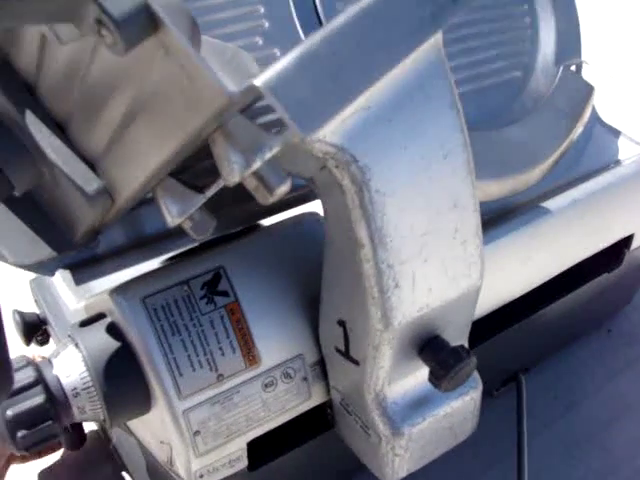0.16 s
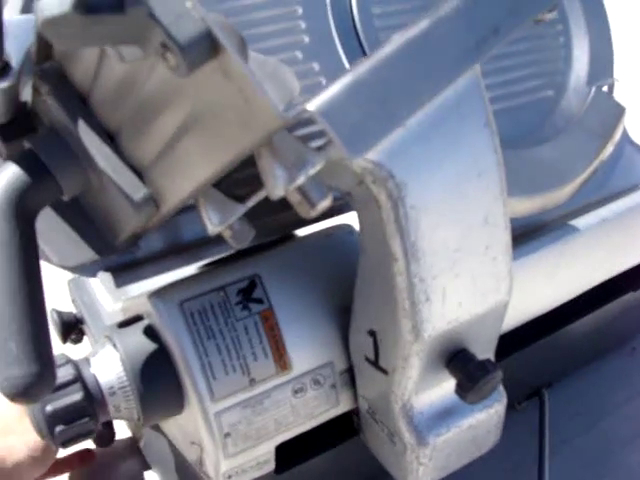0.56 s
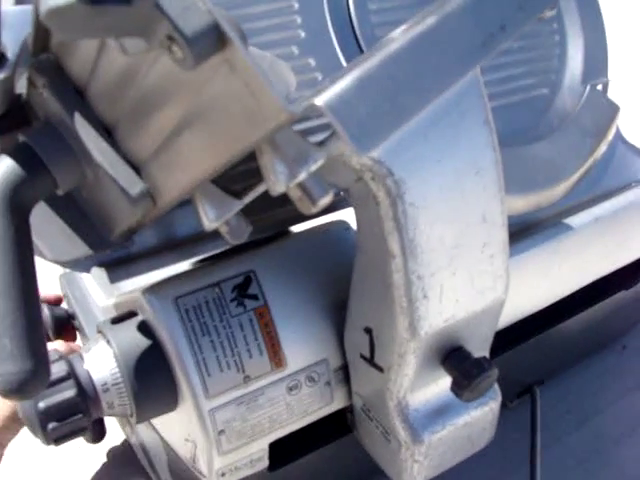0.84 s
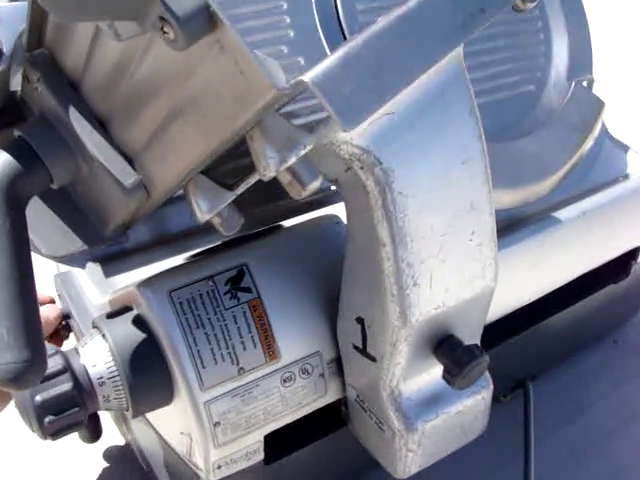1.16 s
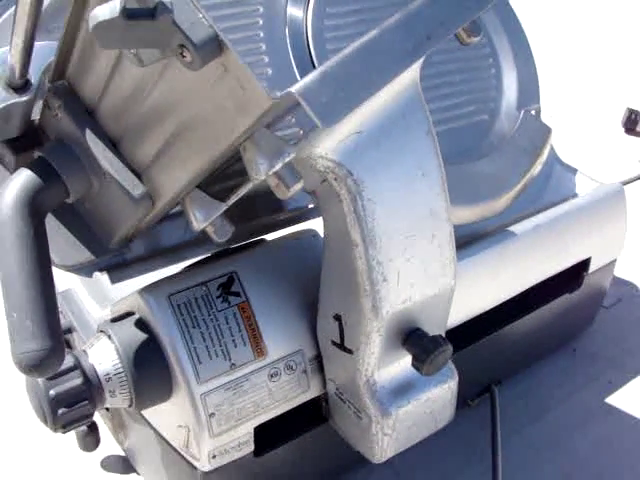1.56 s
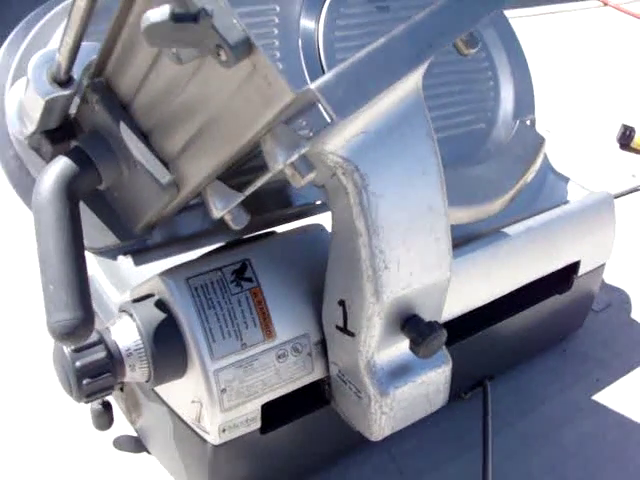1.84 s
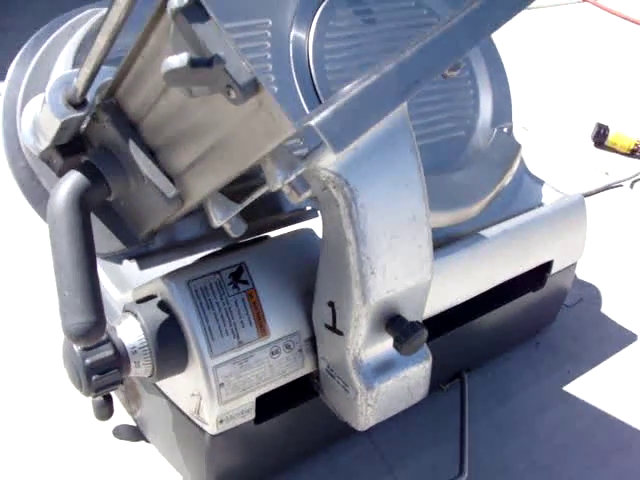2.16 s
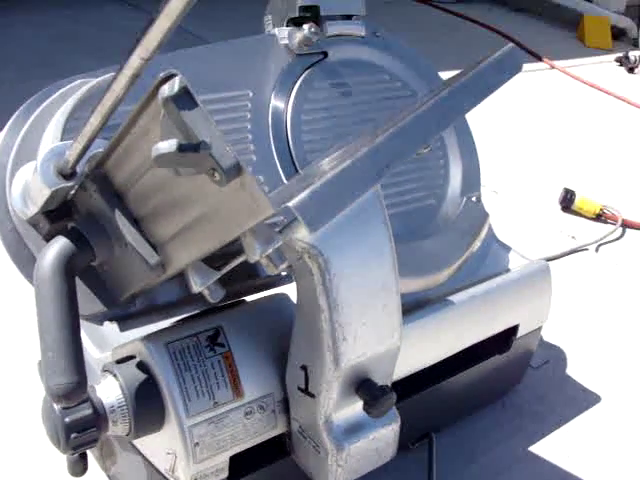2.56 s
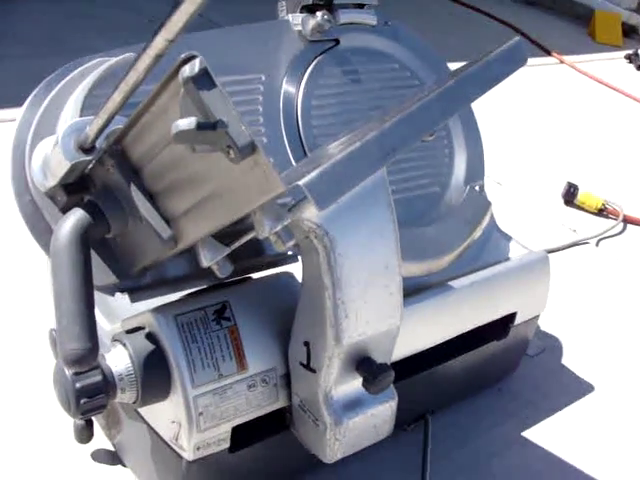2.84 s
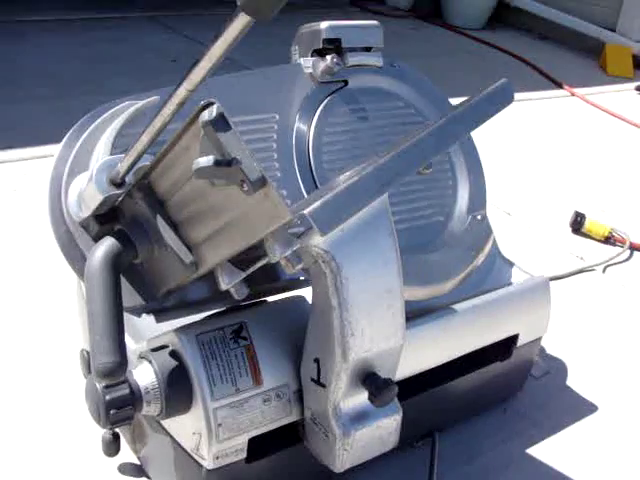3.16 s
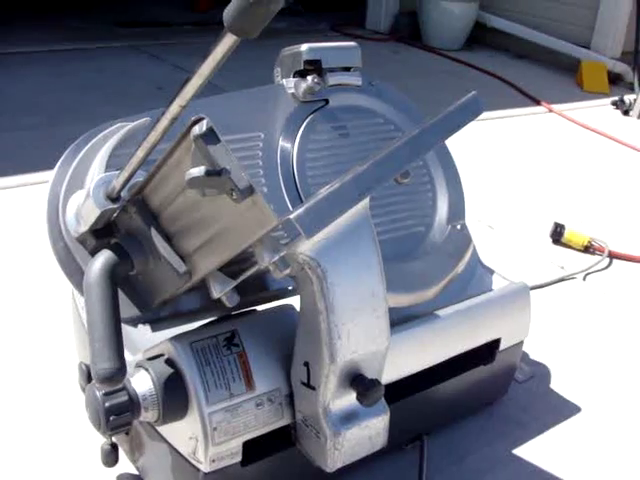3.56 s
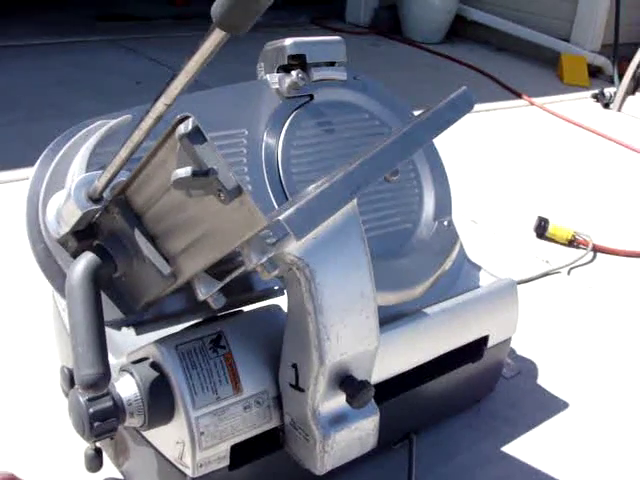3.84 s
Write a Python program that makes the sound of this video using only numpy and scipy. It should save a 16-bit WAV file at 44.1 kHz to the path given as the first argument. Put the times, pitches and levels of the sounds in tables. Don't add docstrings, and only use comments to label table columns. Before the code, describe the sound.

Meat slicer motor snaps on with a clattering jolt, then hums with a quick rhythmic rattle outdoors.

```python
import sys
import numpy as np
from scipy import signal
from scipy.fft import rfft, irfft, next_fast_len
from scipy.io import wavfile
from scipy.ndimage import uniform_filter1d, map_coordinates

SR = 44100
rng = np.random.default_rng(int(sys.argv[2]) if len(sys.argv) > 2 else 0)


def wav_out(sig):
    wavfile.write(sys.argv[1], SR, np.round(np.clip(np.atleast_2d(sig).T, -1, 1) * 32767).astype(np.int16))


def elevation(decibels):
    levels = np.asarray(decibels, float)
    return 10 ** (levels / 20)


N = 176400

# frequency in Hz, density in dB per Hz.
YARD_SPECTRUM = [(15, -33.5), (40, -11), (120, -12), (300, -16.5), (1000, -20), (2400, -22), (3000, -23.5),
                 (5000, -28.5), (9900, -36), (12000, -78.5)]
# centre in Hz, width in octaves, level in dB.
DRONES = [(632, 0.073, -55.5), (1250, 0.039, -60.5), (1846, .04, -62), (2150, 0.048, -64.5)]
# start in seconds, length in seconds, first pitch in Hz, last pitch in Hz, level in dB.
BIRD_CALLS = [(0.017, 0.022, 6000, 5850, -51), (.01, 0.073, 3470, 3400, -49),
              (0.101, .035, 5000, 3490, -44.5), (0.141, 0.045, 4900, 3250, -46),
              (0.275, 0.12, 4890, 2200, -49), (0.527, 0.013, 4160, 4900, -44),
              (0.535, 0.049, 5200, 4420, -51), (0.552, .09, 3730, 3250, -47), (.57, .06, 4030, 3700, -46.5),
              (0.602, .06, 3900, 3000, -51), (.055, 0.051, 6000, 5380, -55),
              (0.608, 0.044, 3070, 2950, -52), (0.673, .04, 2250, 2150, -51),
              (3.807, 0.037, 4650, 4480, -43), (3.817, 0.075, 4390, 4270, -48),
              (3.834, 0.066, 3470, 3360, -42)]
# start in seconds, length in seconds, centre in Hz, width in octaves, level in dB.
RUBS = [(0, .025, 2200, 1.1, -39), (1.01, .11, 1600, .5, -43), (2.22, .28, 1600, .9, -30),
        (2.18, .36, 5000, .8, -46), (2.31, .15, 5800, .6, -44), (2.33, .05, 5600, .05, -46),
        (2.31, .06, 1540, .05, -32), (2.355, .06, 1480, .05, -30), (2.4, .05, 1250, .08, -33),
        (2.32, .13, 1050, .15, -33), (2.18, .13, 3000, .25, -38), (2.21, .04, 6500, .5, -47),
        (1.62, .07, 7500, .35, -45), (1.79, .035, 7000, .25, -45), (1.85, .05, 6000, .5, -50),
        (1.918, .03, 6500, .2, -43), (2.46, .04, 7000, .2, -47), (2.655, .04, 6500, .5, -46),
        (2.77, .04, 7500, .3, -46), (2.9, .04, 6500, .15, -48), (3.47, .04, 7500, .3, -48),
        (1.5, .13, 2200, .35, -38), (0, .2, 110, .8, -52), (1.14, .07, 2200, .7, -48),
        (1.48, .25, 780, .3, -36)]
# start in seconds, level in dB, decay by 60 dB in seconds, centre in Hz.
TAPS = [
    (0.739, -30, 0.059, 1510),
    (.89, -22, 0.11, 2380),
    (0.977, -27.5, 0.053, 4500),
    (1.185, -44.5, .05, 3700),
    (1.2465, 4, 0.0075, 4470),
    (1.534, -19, 0.056, 1100),
    (2.658, -27, 0.031, 1500),
]
# frequency in Hz, level in dB.
SWITCH_MODES = [(861, -0.5), (1150, -7), (1490, -4.5), (1850, -8.5), (2800, -5.5), (3430, 0), (4700, -15),
                (6200, -3.5), (7600, -10)]
# start in seconds, length in seconds, frequency in Hz, level in dB.
BUMPS = [
    (.79, .03, 65, -37),
    (1.155, .03, 360, -48),
    (.88, .03, 50, -46),
]
# time in seconds, level in dB.
JOLT = [
    (1.242, -40),
    (1.2453, -10),
    (1.289, -15),
    (1.295, -21.5),
    (1.35, -23),
    (1.385, -31),
    (1.44, -35),
    (1.47, -50.5),
    (1.6, -57),
]
# frequency in Hz, density in dB per Hz.
CLATTER_SPECTRUM = [(88, -62), (150, -20.5), (665, -25), (1400, -7), (2400, -14.5), (3050, -8.5),
                    (4700, -18.5), (7500, -13), (9900, -22.5), (12800, -43)]
# start in seconds, length in seconds, frequency in Hz, level in dB.
RINGS = [
    (1.258, 0.028, 1010, -15),
    (1.276, 0.016, 2975, -14),
    (1.314, 0.027, 1790, -22.5),
    (1.338, 0.019, 780, -16),
    (1.352, 0.031, 860, -20),
    (1.35, 0.023, 1200, -32),
    (1.3, 0.045, 840, -27.5),
    (1.265, 0.062, 510, -25.5),
    (1.7, 0.011, 1100, -27),
    (1.7, .02, 2200, -41),
]
# frequency in Hz, width in Hz, level in dB.
FRAME_MODES = [(479.6, 56, -1.5), (593, 40, -4), (760, 68, -2.5), (1027, 31, -5.5), (1290, 32, -10),
               (1507, 24, -5), (1807, 39, -6), (2250, 49, -6.5), (2965, 190, -18), (3250, 100, -14.5),
               (3450, 200, -18)]
# frequency in Hz, density in dB per Hz.
WHIR_SPECTRUM = [(60, -49), (100, -3), (160, -5), (450, -5), (900, -10), (2100, -15.5), (2600, -24.5),
                 (3700, -23), (4600, -32.5), (9900, -36.5), (12000, -87.5)]
# time in seconds, level in dB, decay by 60 dB in seconds.
SNAP = (1.2472, -22, .006)
# start in seconds, length in seconds, centre in Hz, width in octaves, level in dB.
GROAN = (1.27, .18, 260, 1.1, -27.5)
# start in seconds, length in seconds, frequency in Hz, level in dB.
SHUDDER = (1.355, .115, 136, -16)
SHUDDER_OVERTONES_DB = [-11, -18, -22]
# multiple of the hum rate, level in dB.
HUM_HARMONICS = [(1, -33.5), (2, -30.5), (3, -34.5), (4, -60.5), (5, -45)]
# frequency in Hz, level in dB.
GEAR_TONES = [(480, -51.5), (790, -46.5), (846, -43.5), (1669, -47.5)]
# hardest knock in seconds, level in dB, half length in seconds.
RATTLES = [(1.589, -28, 0.021), (1.7313, -24.5, 0.015), (1.872, -19.5, 0.014), (2.0113, -17, 0.0095),
           (2.1548, -19, .013), (2.299, -21, 0.02), (2.4361, -21, 0.014), (2.58, -20.5, 0.013),
           (2.7174, -20.5, 0.014), (2.8532, -18, 0.011), (2.998, -21, 0.014), (3.1377, -20.5, 0.012),
           (3.2803, -19, 0.015), (3.4185, -19, 0.013), (3.558, -19.5, 0.011), (3.7, -20.5, 0.01),
           (3.8406, -20, 0.012), (3.9818, -20.5, .013)]
BITES_S = [1.569, 1.72, 1.8598, 2.0018, 2.139, 2.2768, 2.418, 2.567, 2.7008, 2.8438, 2.9778, 3.1178, 3.2598,
           3.4018, 3.5438, 3.6848, 3.8188, 3.9608]
# frequency in Hz, width in Hz, level in dB.
HOUSING_MODES = [(507, 130, 2), (756, 206, 1.5), (985, 118, -3), (1370, 190, -11), (1773, 43, -8),
                 (2250, 24, -6.5), (3300, 700, -18)]
# start in seconds, end in seconds, lower edge in Hz, upper edge in Hz.
DROPOUTS = [(.712, .736, 6000, 7200), (.72, .736, 4500, 5400), (.962, .975, 4200, 7800),
            (1.213, 1.24, 1400, 12000), (.005, .02, 4600, 9000), (1.897, 1.92, 6000, 7300),
            (1.945, 1.966, 6200, 7300), (1.452, 1.464, 5600, 7200), (1.38, 1.392, 7200, 9500)]

HUM_HZ = 120.02
START_S = 1.243
BEFORE_BITE_DB, BITE_DB = -7, 3.5
FRAME_TOP_HZ = 3900


def unit(x):
    return x / np.sqrt(np.mean(x ** 2) + 1e-20)


def wobble(rate, size=N):
    steps = np.arange(0, size + 32, 32)
    knots = rng.standard_normal(int(N * rate / SR) + 4)
    return np.interp(np.arange(size), steps, map_coordinates(knots, [steps * rate / SR]))


def filtered(x, response):
    m = next_fast_len(len(x) + 8192)
    hz = np.fft.rfftfreq(m, 1 / SR) + 1
    return irfft(rfft(x, m) * response(hz), m)[:len(x)]


def coloured(x, points):
    f, db = np.transpose(points)
    return unit(filtered(x, lambda hz: elevation(np.interp(np.log(hz), np.log(f), db))))


def band(size, hz, octaves):
    noise = rng.standard_normal(size)
    return unit(filtered(noise, lambda f: np.exp(-(np.log2(f / hz) / octaves) ** 2 / 2)))


def ticks(rate, spread_db):
    chance, side = rng.random((2, N))
    return (chance < rate / SR) * np.sign(side - 0.5) * elevation(spread_db * rng.standard_normal(N))


def resonance(f, centre, width):
    return 1j * f * width / (centre ** 2 - f ** 2 + 1j * f * width)


def frame(x):
    def response(f):
        modes = sum((-1) ** k * elevation(db) * resonance(f, hz, 0.96 * width)
                    for k, (hz, width, db) in enumerate(FRAME_MODES))
        direct = elevation(-29.5) * 1j * f / (400 + 1j * f) / (1 + 1j * f / 2500)
        return (modes + direct) / (1 + (f / FRAME_TOP_HZ) ** 8)
    return unit(filtered(x, response))


def add(out, s, x):
    part = out[max(round(s * SR), 0):][:len(x)]
    part += x[:len(part)]


def swell(length, sharp):
    t = np.arange(round(length * SR)) / SR
    return t, signal.windows.tukey(len(t), sharp)


def add_ring(out, s, length, hz, db):
    t, shape = swell(length, 0.61)
    level = elevation(db + 3 + 0.89 * wobble(77, len(t)))
    add(out, s, level * shape * np.sin(2 * np.pi * hz * t + 0.5 * wobble(80, len(t))))


def add_rub(out, s, length, hz, octaves, db):
    t, shape = swell(length, 0.42)
    add(out, s, elevation(db + 2.4 * wobble(85.6, len(t))) * shape * band(len(t), hz, octaves))


def yard_air():
    level = elevation(-47 + wobble(9.1) + 0.82 * wobble(15))
    out = level * coloured(rng.standard_normal(N), YARD_SPECTRUM)
    for hz, octaves, db in DRONES:
        out += elevation(db + 1.8 * wobble(4.6)) * band(N, hz, octaves)
    return out


def birds():
    out = np.zeros(N)
    for s, length, from_hz, to_hz, db in BIRD_CALLS:
        t, shape = swell(length, 0.11)
        hz = to_hz + (from_hz - to_hz) * (1 - t / length) ** 1.5
        hz = hz * (1 + 0.028 * wobble(300, len(t)))
        level = elevation(db + 3 * wobble(120.3, len(t)))
        add(out, s, level * shape * np.sin(2 * np.pi * np.cumsum(hz) / SR))
    t = np.arange(SR // 3) / SR
    echo = rng.standard_normal(len(t)) * elevation(-60 * t / 0.3)
    return out + elevation(-1) * signal.fftconvolve(out, echo / np.linalg.norm(echo))[:N]


def rubs():
    out = np.zeros(N)
    for row in RUBS:
        add_rub(out, *row)
    return out


def taps():
    out, t = np.zeros(N), np.arange(SR // 5) / SR
    for s, db, t60, centre_hz in TAPS:
        ring = np.zeros(len(t))
        for hz, mode_db in SWITCH_MODES:
            start_db = mode_db - 4.4 * abs(np.log2(hz / centre_hz)) + rng.normal(0, 2.3)
            decay_db = 60 * t / t60 * (hz / 1500) ** 0.33
            phase = 2 * np.pi * hz * t + 2.4 * wobble(140, len(t))
            ring += elevation(start_db - decay_db) * np.sin(phase)
        noise = elevation(-60 * t / t60) * band(len(t), centre_hz, 0.9)
        attack = 1 - np.exp(-t / 0.00087)
        add(out, s, elevation(db) * attack * (0.69 * ring + 0.3 * noise))
    return out


def bumps():
    out = np.zeros(N)
    for row in BUMPS:
        add_ring(out, *row)
    return out


def start_up():
    s, level_db = np.transpose(JOLT)
    t = np.arange(N) / SR
    level = (t > s[0]) * elevation(np.interp(t, s, level_db, right=-120) + 0.94 * wobble(90))
    out = level * (coloured(ticks(7000, 3.2), CLATTER_SPECTRUM) + 0.29 * frame(ticks(5000, 2.5)))
    for row in RINGS:
        add_ring(out, *row)
    return out


def hum_beat():
    turn = 2 * np.pi * HUM_HZ * np.arange(N) / SR
    return 1 + 0.25 * np.cos(turn + np.pi) + 0.23 * np.cos(2 * turn + 0.89)


def whir():
    beat = hum_beat()
    air = elevation(-33.5 + 0.79 * wobble(20)) * coloured(beat * rng.standard_normal(N), WHIR_SPECTRUM)
    chatter = elevation(-37.5 + 1.7 * wobble(24.97)) * frame(beat * ticks(2200, 2.8))
    return (np.arange(N) / SR > START_S) * (air + chatter)


def blade():
    t = np.arange(N) / SR - START_S
    sway_db = 1.8 * (wobble(5.85) + 1.4 * wobble(30))
    return (t > 0) * elevation(-46.5 - 2.3 * t + sway_db) * band(N, 6500, 0.7)


def treble_snap():
    s, db, t60 = SNAP
    t = np.arange(N) / SR
    burst = (t > s) * elevation(db - 60 * np.abs(t - s) / t60) * rng.standard_normal(N)
    return filtered(burst, lambda f: (f > 9000) * (f < 15800))


def groan():
    out = np.zeros(N)
    add_rub(out, *GROAN)
    return out


def rocking():
    out = np.zeros(N)
    s, length, hz, db = SHUDDER
    t, shape = swell(length, 0.47)
    turn = 2 * np.pi * hz * t + 0.27 * wobble(39.5, len(t))
    tone = sum(elevation(o) * np.cos((k + 1) * turn) for k, o in enumerate([0] + SHUDDER_OVERTONES_DB))
    add(out, s, -elevation(db + 1) * shape * tone)
    return out


def hum():
    t = np.arange(N) / SR
    out = np.zeros(N)
    for k, db in HUM_HARMONICS:
        level = elevation(db + 4 + 1.54 * wobble(12 * k))
        out += level * np.cos(2 * np.pi * k * HUM_HZ * t - 2.2 + 0.2 * wobble(9))
    for hz, db in GEAR_TONES:
        out += elevation(db + 3 + 3.3 * wobble(15)) * np.cos(2 * np.pi * hz * t + 0.77 * wobble(12))
    return np.clip((t - 1.306) / 0.058, 0, 1) * out


def rattle():
    t = np.arange(N) / SR
    shake = np.zeros(N)
    for (s, db, half), bite in zip(RATTLES, BITES_S):
        late, louder = rng.standard_normal(2)
        level = elevation(db + 20 + 0.5 * louder + BEFORE_BITE_DB * (t < bite))
        width = half * np.where(t < s, 1.8, 1.2)
        shake += level * np.exp(-((t - s - 0.001 * late) / width) ** 2 / 2)
    return elevation(-18.5 - 19) * frame(shake * hum_beat() * ticks(2600, 2.5))


def knocks():
    mesh_hz = 248
    blows, tooth = np.zeros(N + SR), np.arange(-9, 10)
    lag = tooth / mesh_hz
    for (s, db, half), bite in zip(RATTLES, BITES_S):
        late, louder = rng.standard_normal((2, len(tooth)))
        since = (s + lag - bite) * mesh_hz
        step_db = np.where(since < 0, BEFORE_BITE_DB, BITE_DB * (since < 1))
        shape = np.exp(-(lag / half / np.where(lag < 0, 1.8, 1)) ** 2 / 2)
        at = np.round((s + lag + 0.00015 * late) * SR).astype(int)
        blows[at] = -elevation(db + step_db + 2 * louder) * shape

    def housing(f):
        modes = sum(elevation(db) * resonance(f, hz, width) for hz, width, db in HOUSING_MODES)
        return modes / (1 + (f / FRAME_TOP_HZ) ** 8)
    return elevation(-12 + 40) * filtered(blows[:N], housing)


def scene():
    motor = hum() + whir() + rattle()
    jolt = start_up() + bumps() + rocking()
    air = blade()
    contact = taps() + rubs() + groan()
    yard = birds() + yard_air()
    return (motor + jolt + air + contact + yard + knocks())[None]


def low_pass(x):
    return signal.sosfilt(signal.butter(12, 10020, fs=SR, output="sos"), x)


def record(dry):
    t = np.arange(N) / SR
    x = dry[0] / (1 + np.abs(dry[0] / 0.97) ** 6) ** (1 / 6)
    x = filtered(x, lambda f: 0.11 + 0.96 / (1 + (f / 10300) ** 40))
    x = x + treble_snap()
    for start, end, low_hz, high_hz in DROPOUTS:
        depth = 0.9 if high_hz < 10000 else 1
        gate = uniform_filter1d(1.0 * (t > start) * (t < end), size=90)
        x = x - depth * gate * filtered(x, lambda f: (f > low_hz) * (f < high_hz))
    return low_pass(x[None])


dry = scene()
out = record(dry)
wav_out(out)
```